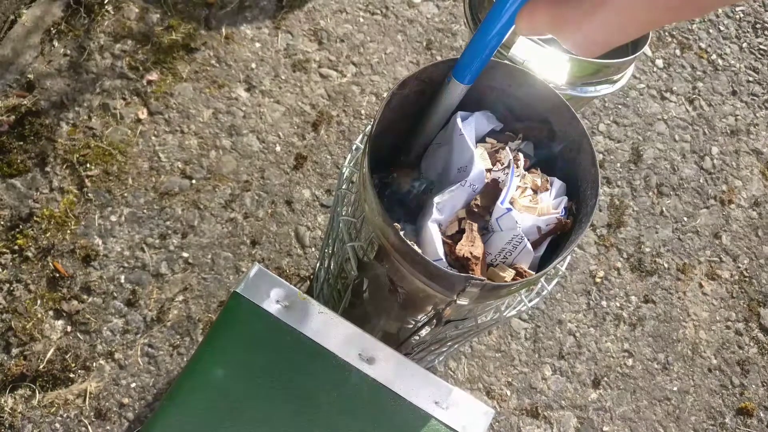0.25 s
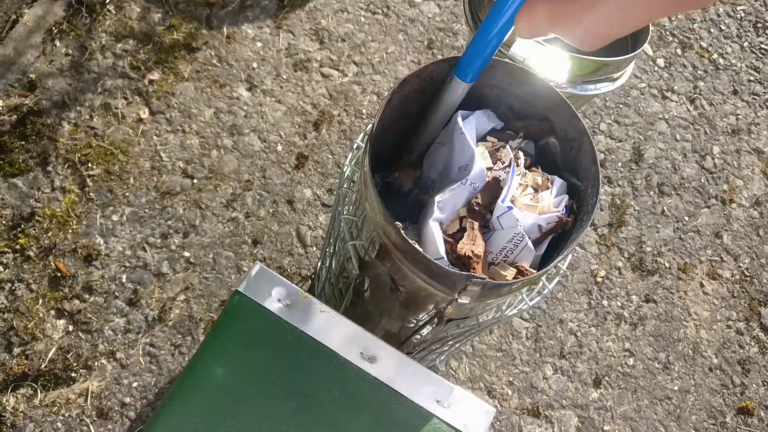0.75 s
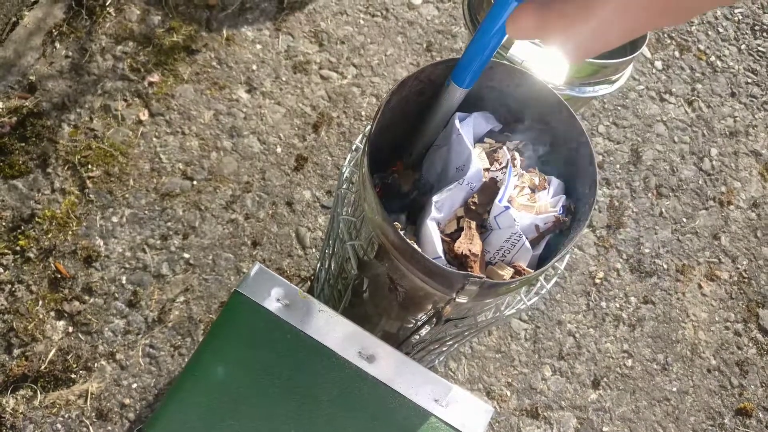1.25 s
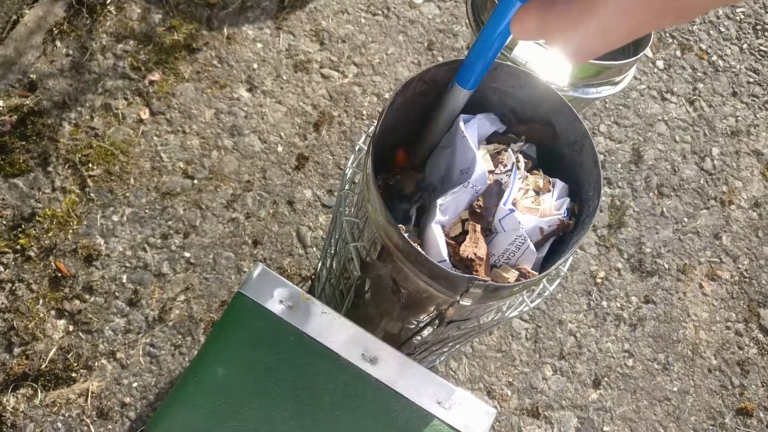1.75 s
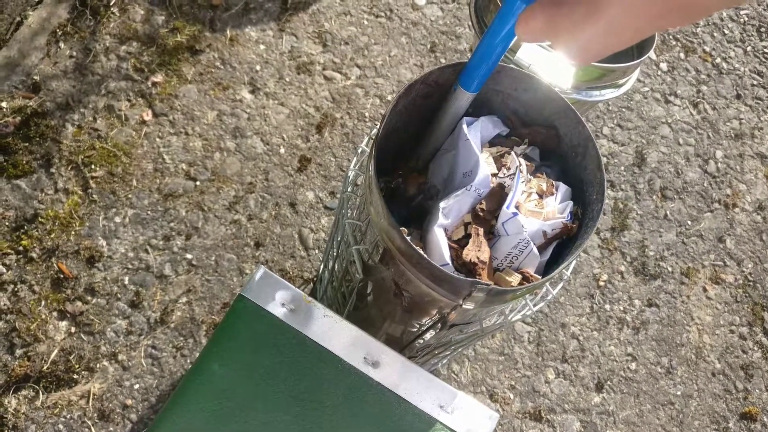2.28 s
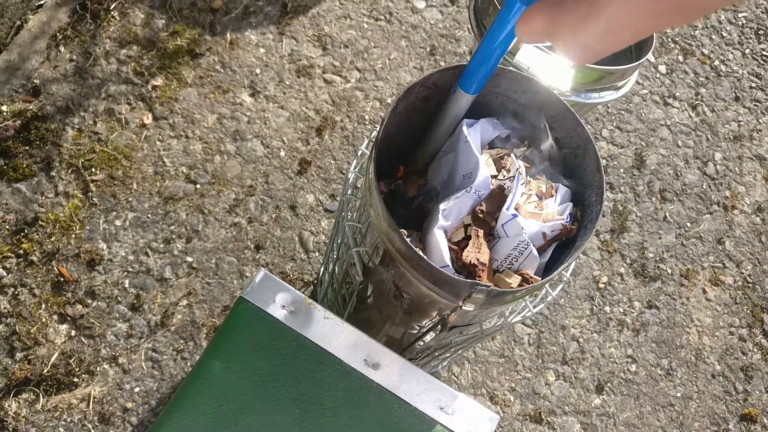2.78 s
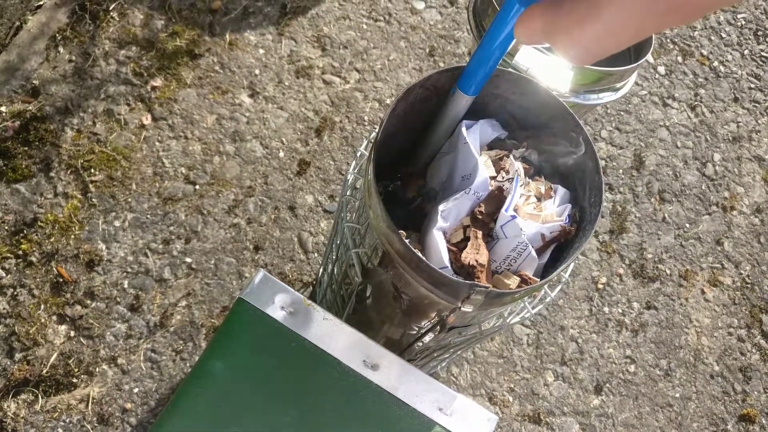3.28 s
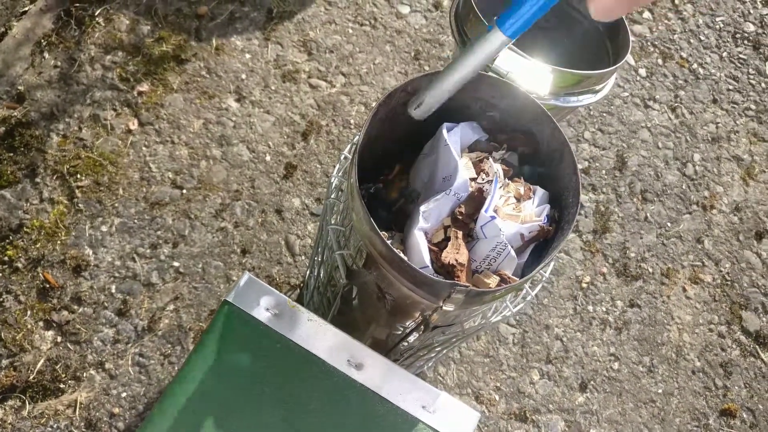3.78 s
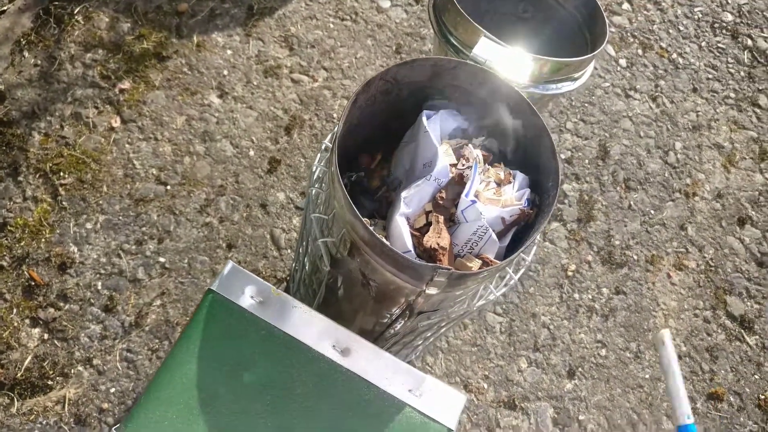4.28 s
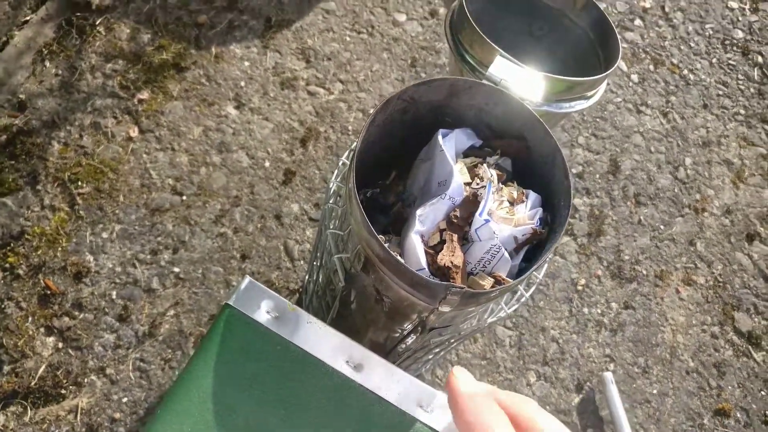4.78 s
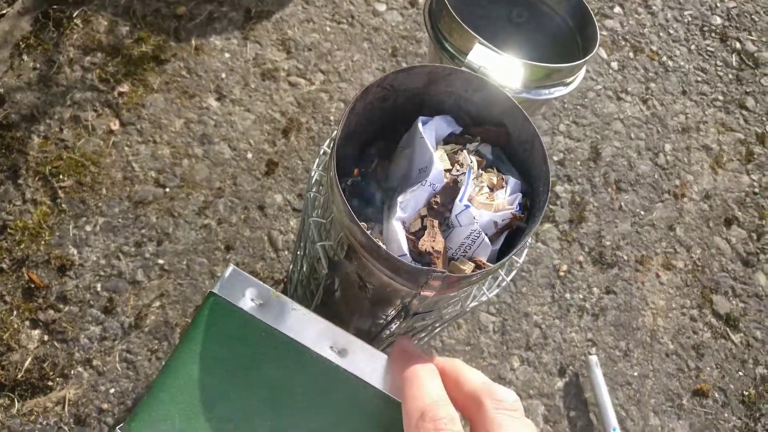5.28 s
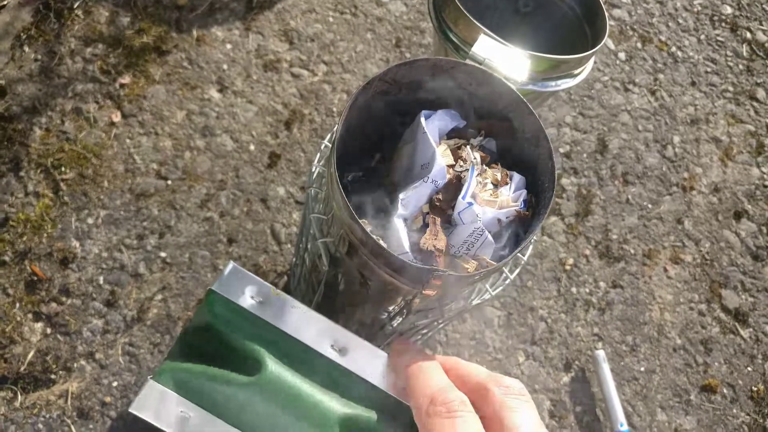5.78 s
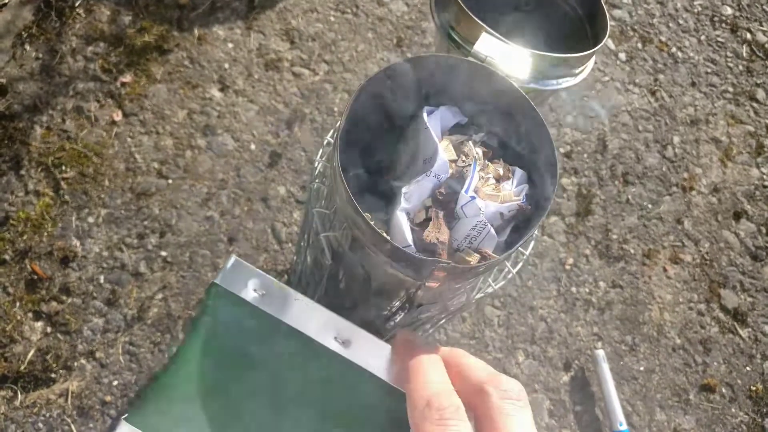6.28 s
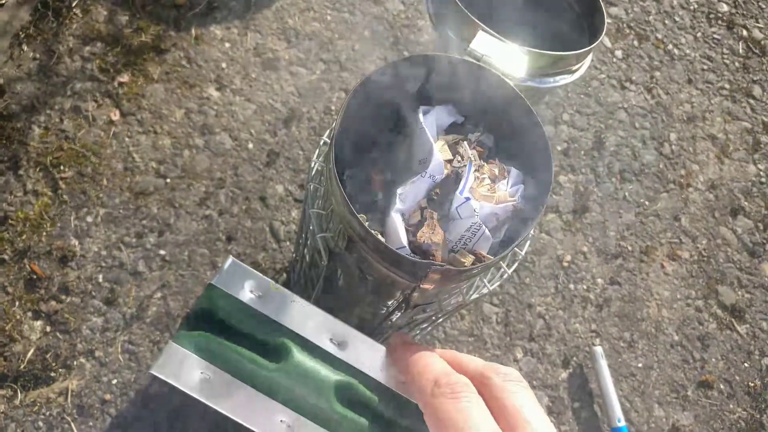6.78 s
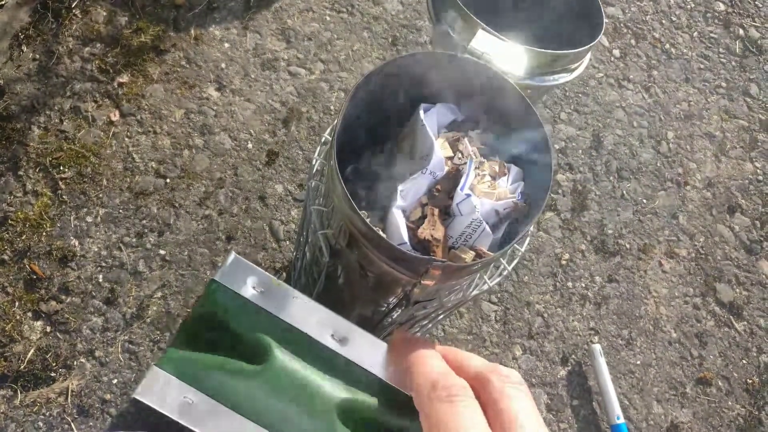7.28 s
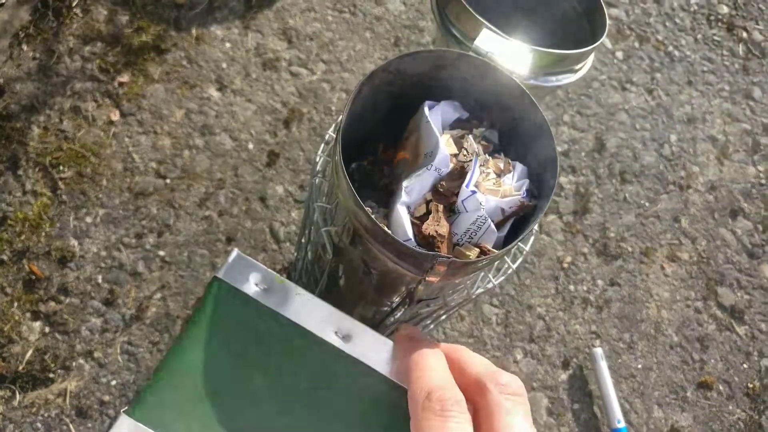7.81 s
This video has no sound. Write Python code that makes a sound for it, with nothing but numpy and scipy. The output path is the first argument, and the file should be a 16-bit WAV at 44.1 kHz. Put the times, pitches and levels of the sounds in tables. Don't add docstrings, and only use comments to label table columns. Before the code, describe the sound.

A gas lighter clicks and scrapes in a metal can, is laid on stony ground, then bellows hiss and clap, rattling the can in gusty wind.

```python
import sys
import numpy as np
from scipy import signal
from scipy.fft import rfft, irfft, next_fast_len
from scipy.io import wavfile
from scipy.ndimage import uniform_filter1d

SR = 44100
rng = np.random.default_rng(int(sys.argv[2]) if len(sys.argv) > 2 else 0)


def invert_db(level):
    return 10 ** (np.asarray(level, dtype=float) / 20)


def int16_out(signal):
    q = np.round(np.clip(np.atleast_2d(signal).T, -1, 1) * 32767)
    wavfile.write(sys.argv[1], SR, q.astype(np.int16))


N = 355005
TIME = np.arange(N) / SR
COARSE_TIME = np.arange(0, N, 32) / SR
SIDES = np.array([[1], [-1]])
LEFT_LAG_S = .00007

# f/Hz, width/Hz, level/dB
NOZZLE_MODES = [(7000, 1000, -3.5), (10780, 1500, 0), (12000, 1100, 0), (14200, 2000, -3)]
# t/s, peak/dB, length of the air cushion's swing/s, lower swing/dB, hard edge knock/dB
BOARD_CLAPS = [
    (6.336, -14.5, 0.0084, -10, -2.5),
    (7.063, -22.5, 0.01, -3, -9),
    (7.7948, -15, 0.0081, -11.5, -1),
]


def unit_rms(x):
    return x / np.sqrt(np.mean(x ** 2) + 1e-20)


def in_time(rows, outside=-120):
    s, *columns = np.transpose(rows)
    return [np.interp(TIME, s, c, outside, outside) for c in columns]


def shaped(x, points):
    hz, level_db = np.transpose(points)
    size = next_fast_len(x.shape[-1] + 999, True)
    bins = np.maximum(np.arange(size // 2 + 1) * SR / size, 1)
    gain = invert_db(np.interp(np.log(bins), np.log(hz), level_db))
    return irfft(rfft(x, size) * gain, size)[..., :x.shape[-1]]


def band(x, low_hz, high_hz):
    edges = [low_hz, min(high_hz, .45 * SR)]
    return signal.sosfilt(signal.butter(2, edges, "band", fs=SR, output="sos"), x)


def resonances(x, peaks):
    out = 0
    for k, (hz, width_hz, level_db) in enumerate(peaks):
        r = np.exp(-np.pi * width_hz / SR)
        b = (1 - r * r) / 2 * np.array([1, 0, -1]) * invert_db(level_db) * (-1) ** k
        a = [1, -2 * r * np.cos(2 * np.pi * hz / SR), r * r]
        out = out + signal.lfilter(b, a, x + 1e-18)
    return out


def drift(rate):
    r = np.exp(-40 * np.pi * rate / SR)
    slow = signal.lfilter([1], [1, -2 * r, r * r], rng.standard_normal(N // 20 + 2002))[2000:]
    return np.interp(np.arange(N) / 20, np.arange(len(slow)), unit_rms(slow))


def pair(alike):
    alike = np.clip(alike, 0, 1)
    mid, side = rng.standard_normal((2, N))
    return np.sqrt((1 + alike) / 2) * mid + np.sqrt((1 - alike) / 2) * side * SIDES


def grains(per_s, spread_db):
    sizes = invert_db(spread_db * np.minimum(rng.exponential(1, N), 4)) * rng.choice([-1, 1], N)
    return unit_rms(sizes * (rng.random(N) < per_s / SR))


def add(out, x, s):
    i = round(s * SR)
    out[..., i:i + x.shape[-1]] += x[..., :N - i]


def power_sum(levels_db):
    return 10 * np.log10(np.sum(invert_db(2 * np.asarray(levels_db)), axis=0) + 1e-30)


def on_port(level_db, pan_db):
    return level_db + 5 - 8.7 * np.logaddexp(0, -pan_db / 8.7)


def far_hum():
    # f/Hz, level/dB per Hz
    hum_colour = [(120, -14.5), (200, -2.5), (283, -7), (424, -19.5), (749, -18), (986, -14), (1370, -20),
                  (1980, -22), (4770, -31), (6880, -33), (9230, -35), (15100, -31), (16000, -37.5)]
    hum = pair(0.38)
    hum[0] = np.roll(hum[0], round(LEFT_LAG_S * SR))
    return invert_db(-67 + 4.0 + .6 * drift(3)) * unit_rms(shaped(hum, hum_colour))


def wind():
    # t/s, level/dB, left minus right/dB
    breeze = [(0, -60.5, 4.5), (1.7, -60.5, 3), (3.3, -59, 4.5), (5.15, -62.5, 9), (5.45, -60.5, 1.5),
              (5.94, -63, 4.5), (6.45, -58.5, 4), (7.21, -58.5, 3.5), (7.65, -63.5, 6.5), (8.05, -58.5, 3)]
    # t/s, peak/dB, left minus right/dB, half length/s
    buffets = [(0.07, -43.5, 30, 0.17), (0.234, -36.5, 32, 0.07), (0.356, -26, 40, 0.034),
               (0.45, -45, 11, 0.11), (0.61, -51, -6, 0.14), (0.813, -51, 29, 0.063), (1.087, -43, 40, .16),
               (1.128, -36.5, 3, 0.027), (1.217, -38, 5.5, 0.054), (1.309, -41.5, 40, 0.1),
               (1.52, -57.5, 20, 0.19), (1.85, -45, 33, 0.055), (1.945, -53.5, 15, 0.062),
               (2.218, -42.5, 48, 0.18), (2.357, -38, 28, .12), (2.462, -37.5, -3.5, 0.077),
               (2.555, -46.5, 0.5, 0.12), (2.647, -45.5, 5, 0.091), (2.883, -47, 9, 0.24),
               (3.139, -54, 20, 0.16), (3.503, -52, 25, 0.049), (3.623, -42.5, 26.5, 0.061),
               (3.762, -36.5, 33, 0.22), (3.855, -33.5, 9.5, 0.16), (4.002, -35, 6, 0.037),
               (4.04, -31.5, 21, 0.013), (4.045, -46.5, 31, 0.11), (4.197, -50.5, -1, 0.4),
               (4.49, -45, 29, .05), (4.787, -51, 11, 0.21)]
    # f/Hz, level/dB per Hz
    eddy_colour = [(12, -37.5), (20, -24), (48, 3.5), (65, 3.5), (91, 1.5), (192, -18), (287, -32),
                   (380, -42.5), (428, -49), (700, -47.5), (910, -83), (1540, -120)]
    fall_db, roundness = 24, 1.55
    level_db, pan_db = in_time(breeze, outside=-60)
    out = np.zeros((2, N))
    for ear, sign in enumerate([1, -1]):
        lumps = []
        for s, peak_db, side_db, half_s in buffets:
            loss_db = fall_db * np.abs((COARSE_TIME - s) / half_s) ** roundness
            lumps.append(on_port(peak_db, sign * side_db) - loss_db)
        buffet_db = np.interp(TIME, COARSE_TIME, power_sum(lumps))
        port_db = power_sum([on_port(level_db, sign * pan_db), buffet_db])
        eddies = unit_rms(shaped(rng.standard_normal(N), eddy_colour))
        eddies = eddies / np.sqrt(uniform_filter1d(eddies ** 2, size=2600) + .15)
        sharp = band(eddies, 127.7, 600) * invert_db(0.43 * np.clip(port_db + 38.0, -30, 12) + 0.5)
        out[ear] = invert_db(port_db + 2.7 * drift(6.8) + 6.5) * (eddies + sharp)
    return out


def thumps():
    # t/s, peak/dB, f/Hz, left minus right/dB
    low_thumps = [(0.352, -35, 190, 25), (1.131, -35.5, 230, 3), (1.318, -30.5, 80, 17),
                  (3.8035, -29, 80, 20), (4.5105, -26, 85, 15)]
    cycles = 1.3
    out = np.zeros((2, N))
    t = np.arange(3000) / SR
    for s, peak_db, hz, pan_db in low_thumps:
        swing = -np.sin(2 * np.pi * hz * t) * np.exp(-(t * hz / cycles) ** 2)
        add(out, swing * invert_db([[on_port(peak_db, pan_db)], [on_port(peak_db, -pan_db)]]), s)
    return out


def rustle():
    # t/s, level/dB
    effort = [(0.4, -73), (1.27, -65.5), (1.49, -72), (1.89, -86), (3.42, -76), (4.26, -64), (4.6, -66.5),
              (4.91, -64.5), (5.05, -65.5), (5.35, -75)]
    dull_db, = in_time(effort)
    bright_db = np.where(dull_db > -119, -75 + 0.98 * (dull_db + 69.0), dull_db)
    rub = pair(0.2) + 0.29 * grains(1100, spread_db=7.0)
    dull = unit_rms(band(rub, 640, 4200)) * invert_db(dull_db + 2.2 * drift(25))
    bright = unit_rms(band(rub, 8600, 15500)) * invert_db(bright_db + 1.6 * drift(30))
    return dull + bright


def scuffs():
    # t/s, length/s, dull/dB, bright/dB, bright centre f/Hz
    rubs = [(0.591, 0.027, -57, -76, 10100), (0.822, .008, -75, -62, 12000), (0.87, 0.021, -52, -66, 10000),
            (1.097, 0.035, -75, -68, 10000), (1.125, 0.046, -51.5, -57, 9800),
            (1.257, 0.074, -49.5, -66, 10260), (1.391, 0.059, -60.5, -66, 9900),
            (1.521, 0.059, -63, -76, 9850), (1.963, 0.037, -71, -76, 9850),
            (3.375, 0.042, -58.5, -81, 10350), (3.424, 0.058, -67.5, -71.5, 10000),
            (3.807, 0.0071, -60, -56, 14500), (4.115, 0.032, -50, -56, 9000), (4.151, 0.02, -48, -55, 9200),
            (4.162, 0.026, -48.5, -47, 5240), (4.158, .03, -70, -56, 14600), (4.122, .035, -72, -60, 14000),
            (4.182, 0.069, -55.5, -53.5, 14100), (4.211, 0.054, -59, -61.5, 13000),
            (4.541, 0.018, -39.5, -57, 9700), (4.584, 0.028, -63, -82.5, 9800),
            (5.02, 0.051, -59.5, -59, 12300), (5.039, 0.032, -56, -45.5, 14000),
            (5.175, 0.063, -74, -68.5, 12000), (5.815, 0.031, -58.5, -70, 7000)]
    out = np.zeros((2, N))
    for s, length, dull_db, bright_db, bright_hz in rubs:
        t = np.arange(round(2 * length * SR)) / SR / length - 1
        sizes = invert_db(3.0 * np.minimum(rng.exponential(1, len(t)), 3))
        taps = sizes * (rng.random(len(t)) < 500 / SR)
        clumps = np.convolve(taps, np.exp(-np.arange(60) / 15), "same")
        rub = rng.standard_normal((2, len(t))) * (1 + clumps)
        dull = invert_db(dull_db) * unit_rms(band(rub, 910, 4700))
        spread = 1 + 0.16 * (bright_hz / 12000.0) ** 1.6
        bright = invert_db(bright_db) * unit_rms(band(rub, bright_hz / spread, bright_hz * spread))
        add(out, (dull + bright) * np.exp(-5 * t ** 2), s - length)
    return out


def clicks():
    # t/s, peak/dB, ring f/Hz, bright share/dB, time to fall 60 dB/ms
    pokes = [(0.487, -59, 3210, 7, 3), (0.508, -63, 1800, 10, 3.1), (0.5126, -29, 2560, -8, 2.3),
             (0.537, -36.5, 4270, -8, 8.6), (0.5762, -35.5, 2030, -9, 16), (0.5904, -34.5, 1930, -5, 26),
             (0.6516, -59, 1980, -20, 17), (0.7012, -29.5, 2030, -12, 4.3), (0.7075, -41.5, 1100, -17, 21),
             (0.853, -25, 2620, -9, 14), (1.0012, -51, 2030, -15, 21), (1.0558, -63, 3070, 7, 9),
             (1.0753, -49, 1840, -16, 11), (1.0977, -39.5, 1960, 0.5, 21), (1.109, -50, 2500, 9, 10),
             (1.1197, -35, 1960, -0.5, 6.6), (1.128, -37, 2100, -2, 13), (1.2115, -55, 1800, -20, 10),
             (1.2195, -21, 3600, -3, 67), (1.2228, -20, 1980, -28, 45)]
    shifts = [(1.3616, -50.5, 1950, -2, 12), (1.3824, -48, 2500, 2, 10), (1.5003, -50, 2070, -9, 26),
              (1.8907, -60.5, 1900, -27.5, 7.8), (1.9453, -51, 2240, -10, 15),
              (2.3446, -43, 1970, -13.5, 26), (2.4715, -53.5, 1890, -8, 11),
              (3.3473, -51.5, 2040, 10.5, 5.1), (3.3777, -45.5, 2570, -0.5, 8),
              (3.4052, -49, 2180, -3, 6.3), (3.5758, -46.5, 3070, 4.5, 17), (3.8002, -27, 2540, -7, 9.9)]
    laid = [
        (3.9748, -48, 1400, -35, 16),
        (4.0899, -19.5, 3480, -12, 12),
        (4.1385, -22.5, 4060, -17, 11.4),
        (4.193, -43, 2610, -15, 9.4),
        (4.197, -50, 5000, -6, 9),
        (4.2174, -49.5, 1910, 4, 9),
    ]
    settling = [(4.4421, -22.5, 2800, -4, 8), (4.5314, -23.5, 1820, -16, 7.5),
                (4.5422, -19.5, 1740, -18, 12), (4.5755, -50, 2100, -20, 10), (4.597, -55, 1900, -27, 10),
                (4.6109, -50.5, 1870, -25, 30), (4.7112, -66.5, 1910, -21, 9),
                (4.7371, -60, 1870, -21, 9.7), (4.781, -43.5, 1780, -12, 15), (4.8532, -45.5, 1980, 6, 5.2),
                (4.993, -52, 1900, 0, 8), (5.021, -52, 4500, -4, 8), (5.0325, -44, 2170, -6, 14),
                (5.0405, -49, 3600, -3, 10), (5.052, -52, 3400, -3, 10)]
    creaks = [(5.798, -50, 1940, -6, 12), (5.88, -58.5, 2200, 1, 5.7), (6.5069, -39, 4000, -7, 20),
              (6.545, -52, 4500, -10, 15), (6.6207, -42.5, 2200, -9, 22), (7.214, -31, 2830, -8, 12),
              (7.3012, -42.5, 3140, -6, 24), (7.357, -55, 6500, 4.5, 20), (7.437, -39, 1840, -7.5, 7.3),
              (7.9957, -57.5, 3230, -42, 6.4)]
    out = np.zeros((2, N))
    t = np.arange(2600) / SR
    for contacts, pan_db in [(pokes, -1.5), (shifts, -1.5), (laid, 4.0), (settling, -1.5), (creaks, -1.5)]:
        for s, peak_db, ring_hz, high_db, t60_ms in contacts:
            low_db = -12 - 0.51 * (peak_db + 40.5) - 0.0099 * (high_db + 14)
            mid, side = rng.standard_normal((2, len(t)))
            hiss = mid + 0.5 * side * SIDES
            rise = np.minimum(t / .0003, 1)
            shape = rise * invert_db(-60e3 * np.maximum(t - .0006, 0) / max(t60_ms, 1))
            crack = hiss * shape + 3.1 * (np.arange(len(t)) == 8)
            burst = crack + hiss * invert_db(-27.0 - 60 * t / 0.077)
            dull = invert_db(low_db + 10.5) * band(burst, 784, 3200)
            bright = band(crack, 7750, 17000) + resonances(crack, [(9200, 820, 1.3)])
            ring = resonances(burst, [(ring_hz, 700, 3.0)])
            ring = ring + invert_db(-5.0) * band(crack, 2500, 9300) + resonances(crack, [(5230, 200, -6)])
            add(out, invert_db(peak_db + pan_db / 2 * SIDES) * (dull + ring + invert_db(high_db) * bright), s)
    return out


def blows():
    snaps = [
        0.8532,
        3.8003,
        4.4422,
    ]
    # f/Hz, width/Hz, peak at each snap/dB
    trigger = [(1450, 410, -55, -41, -38), (2460, 290, -38.5, -42.5, -40.5), (2880, 420, -44, -43, -31.5),
               (4300, 520, -41, -38, -33), (5285, 300, -44, -36, -50), (7100, 340, -46, -43, -41),
               (9500, 420, -35, -36.5, -34), (10800, 500, -41, -42, -48), (12900, 600, -46, -41, -38),
               (14400, 500, -42, -33, -40)]
    strikes = [
        4.0899,
        4.1388,
    ]
    # f/Hz, width/Hz, peak at each strike/dB
    barrel = [(1950, 155, -39.5, -36.5), (3400, 270, -39, -32), (3770, 280, -35, -35.5),
              (4400, 440, -38, -32), (5240, 220, -37, -34), (6500, 400, -44, -44), (8770, 300, -35, -44),
              (11600, 560, -36, -46), (15200, 800, -40, -50)]
    jumps = [7.2146]
    # f/Hz, width/Hz, peak/dB
    spring = [(1800, 280, -37), (3080, 300, -37), (5500, 700, -34), (9000, 650, -40), (11500, 750, -38)]
    out = np.zeros((2, N))
    t = np.arange(1500) / SR
    for times, modes, pan_db in [(snaps, trigger, -1.5), (strikes, barrel, 4.0), (jumps, spring, -1.5)]:
        hz, width_hz, *peaks_db = np.transpose(modes)
        for s, peak_db in zip(times, peaks_db):
            chatter = rng.standard_normal(len(t)) * (rng.random(len(t)) < .1)
            push = invert_db(-4.5) * chatter * np.exp(-t / .0012)
            push[0] = 1
            start_db = peak_db + 20 * np.log10(SR / width_hz / np.pi)
            ring = resonances(push, zip(hz, width_hz, start_db))
            add(out, ring * invert_db(pan_db / 2 * SIDES + 1.5), s)
    return out


def rattles():
    # t/s, peak/dB, time to fall 60 dB/s, brightness/dB
    shakes = [(1.2182, -20, 0.026, 6), (1.222, -16, 0.056, 7), (1.2417, -27, 0.21, -5.5),
              (6.3465, -18.5, 0.18, -5.5), (6.3528, -60.5, 0.093, -18), (6.3733, -26.5, 0.07, 4),
              (7.0724, -24, 0.19, -2), (7.084, -34, 0.087, 6), (7.1014, -30, 0.095, 8),
              (7.128, -35.5, 0.065, -7), (7.8061, -22, 0.13, -3.5), (7.8184, -24.5, 0.053, 0),
              (7.8374, -22, 0.11, 5.5), (7.857, -30, 0.11, -7)]
    # f/Hz, width/Hz, level/dB
    can_modes = [(305, 98, -3.5), (416, 240, -12), (937, 41, -4.5), (1050, 18, -7), (1148, 36, -5),
                 (1234, 26, -3), (1642, 30, -6), (2030, 53, -1.5), (2130, 31, -6.5), (2338, 26, 0.5),
                 (2510, 55, -20), (2830, 73, -7.5), (2838, 40, 0.5), (3470, 39, -4), (3600, 22, -15.5),
                 (4160, 82, -6), (4930, 80, -18.5), (6030, 170, -6.5)]
    dull, bright = np.zeros((2, N))
    t = np.arange(SR // 3) / SR
    for s, peak_db, t60, bright_db in shakes:
        shake = np.minimum(t / 0.0012, 1) * invert_db(peak_db - 60 * t / max(t60, .01))
        add(dull, shake, s)
        add(bright, shake * invert_db(bright_db), s)
    taps = grains(6000, spread_db=3.0)
    out = np.zeros((2, N))
    for ear in range(2):
        wall = [(hz, width, level_db + rng.normal(0, 0.41)) for hz, width, level_db in can_modes]
        ring = resonances(taps * dull, wall) + invert_db(-17.0) * band(taps * dull, 1300, 6600)
        crackle = resonances((taps + rng.standard_normal(N)) * bright, NOZZLE_MODES)
        out[ear] = invert_db(6.5) * ring + invert_db(-15) * crackle
    return out


def claps():
    out = np.zeros((2, N))
    t = np.arange(3000) / SR
    for s, peak_db, length, lower_db, knock_db in BOARD_CLAPS:
        cushion = (1 - np.exp(-(t / .0005) ** 2)) * np.exp(-(t / length) ** 6)
        upper = np.sin(2 * np.pi * 315 * t) * invert_db(-60 * t / .07)
        lower = invert_db(lower_db) * np.sin(2 * np.pi * 142 * (t - .0014))
        knock = invert_db(knock_db - 60 * t / 0.011) * np.sin(2 * np.pi * 520 * t)
        frame = invert_db(-19 - 60 * t / 0.14) * np.sin(2 * np.pi * 110 * t)
        frame = frame * (1 - np.exp(-t / 0.00077))
        for ear, lag in enumerate([.0003, -.0002]):
            add(out[ear], invert_db(peak_db) * (cushion * (upper - lower + knock) - frame), s + lag)
    return out


def airflow():
    # t of full flow/s, flow/dB, rise/s
    squeezes = [
        (6.201, -60.5, 0.077),
        (6.96, -59.5, 0.13),
        (7.72, -56.5, 0.11),
    ]
    # t of full flow/s, flow/dB, rise/s, fall/s
    refills = [
        (5.7, -68, .25, 0.11),
        (6.02, -59.5, 0.22, 0.078),
        (6.63, -54, 0.28, 0.22),
        (7.31, -52, 0.18, 0.26),
        (8.04, -49.5, 0.086, .2),
    ]
    t = COARSE_TIME
    cavity, jet, pipe, nozzle = [], [], [], []
    for (s, flow_db, rise), clap in zip(squeezes, BOARD_CLAPS):
        before, after = np.maximum(clap[0] - t, 0), np.maximum(t - clap[0], 0)
        surge_db = 1.5 * np.exp(-before / 0.032)
        push_db = flow_db - 28 * (np.maximum(s - t, 0) / rise) ** 1.45 + surge_db
        dying_db = 4 - 70 * after - 900 * np.maximum(after - .15, 0)
        cavity.append(push_db + np.where(after > 0, dying_db, -14))
        jet.append(push_db + 5 - 59 * after - 400 * np.maximum(after - .13, 0))
        nozzle.append(push_db - 190 * after)
    for s, flow_db, rise, fall in refills:
        edge_db = -20.5 * np.where(t < s, (s - t) / rise, (t - s) / fall) ** 2
        cavity.append(-60 + 0.44 * (flow_db + 56) + 0.86 * edge_db)
        pipe.append(flow_db + edge_db)
        nozzle.append(flow_db - 14 + 1.2 * edge_db)
    return [np.interp(TIME, t, power_sum(part)) for part in (cavity, jet, pipe, nozzle)]


def bellows():
    # f/Hz, width/Hz, level/dB
    pipe_modes = [(860, 374, 0.5), (1570, 550, 1.5), (2155, 780, 1.5), (3030, 860, 1), (4270, 2550, -5)]
    cavity_db, jet_db, pipe_db, nozzle_db = airflow()
    flutter_db = 1.5 * drift(35) + drift(300)
    cavity = resonances(resonances(pair(0.69), [(310.0, 58, 0)]), [(280.0, 180, 0)])
    pipe = unit_rms(resonances(resonances(pair(0.17), pipe_modes), pipe_modes))
    jet = band(pipe, 1370, 14000) + resonances(pipe, [(2280, 140, 1.3), (3780, 190, 7.6)])
    inlet = pipe + resonances(pipe, [(971, 46, 0.9)])
    nozzle = resonances(resonances(pair(0.054), NOZZLE_MODES), NOZZLE_MODES)
    out = unit_rms(cavity) * invert_db(cavity_db + 0.65 * drift(11))
    out += unit_rms(jet) * invert_db(jet_db + flutter_db)
    out += unit_rms(inlet) * invert_db(pipe_db + flutter_db)
    out += unit_rms(nozzle) * invert_db(nozzle_db + flutter_db)
    return out


def through_ports(near):
    # f/Hz, left minus right/dB
    port_colour = [(200, 3), (700, -6), (1300, -7), (2400, -6.5), (4400, 4.5), (6500, -3.5), (9500, -15.5),
                   (15000, -7)]
    half = np.array(port_colour) / [1, 2]
    left = np.roll(near[0], round(LEFT_LAG_S * SR))
    return np.array([shaped(left, half), shaped(near[1], half * [1, -1])])


def scene():
    background = far_hum() + wind() + thumps()
    lighter = rustle() + scuffs() + clicks() + blows()
    pumping = rattles() + claps() + bellows()
    return background + through_ports(lighter + pumping)


def band_limit(x):
    return signal.sosfilt(signal.butter(12, 16850, fs=SR, output="sos"), x)


def record(dry):
    x = signal.sosfilt(signal.butter(4, 44, "high", fs=SR, output="sos"), dry)
    x = shaped(x, [(15700, 0.5), (15950, -24.0), (16550, -24.5), (16750, -75.5)])
    return band_limit(x)


dry = scene()
out = record(dry)
int16_out(out)
```